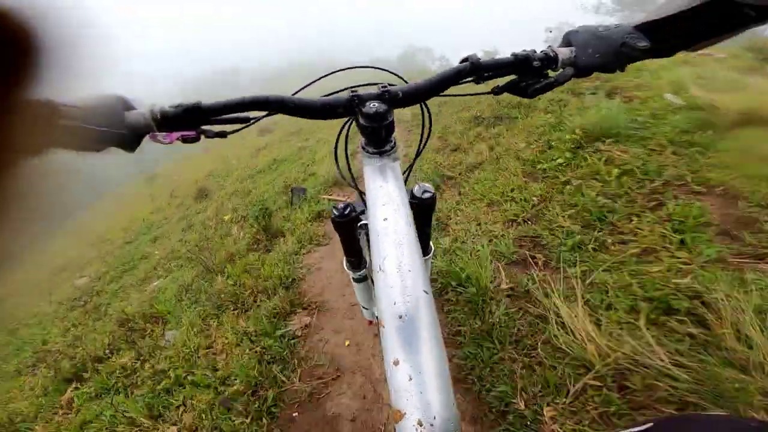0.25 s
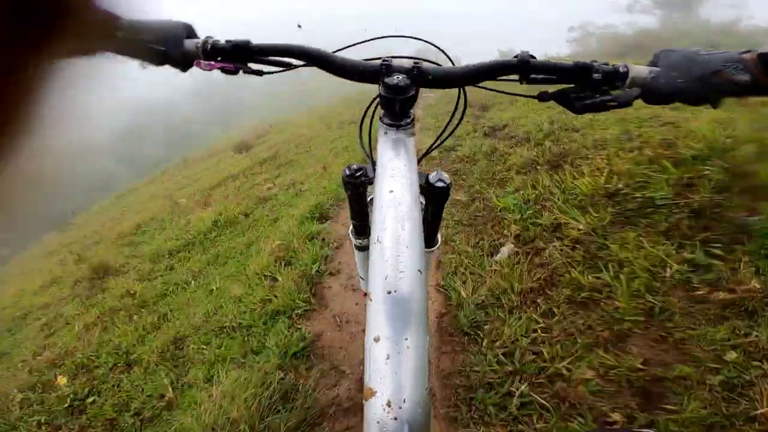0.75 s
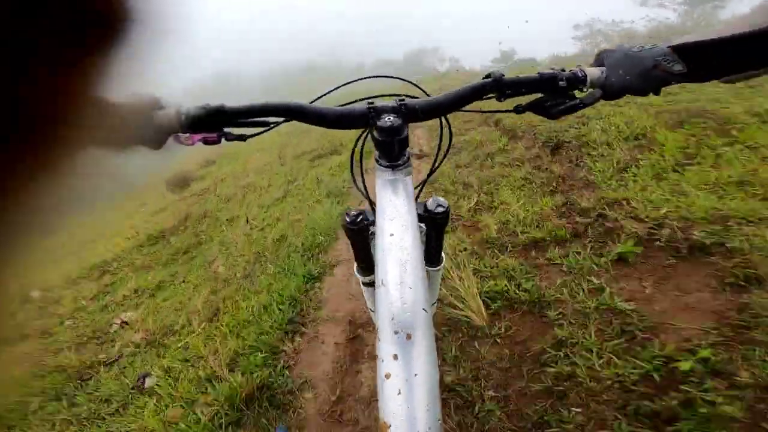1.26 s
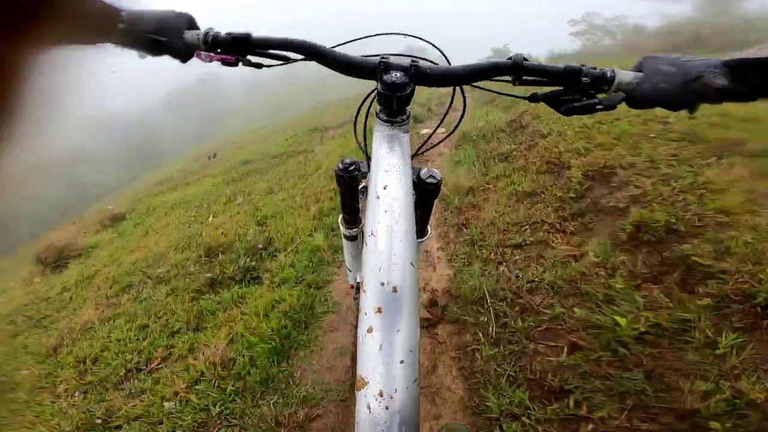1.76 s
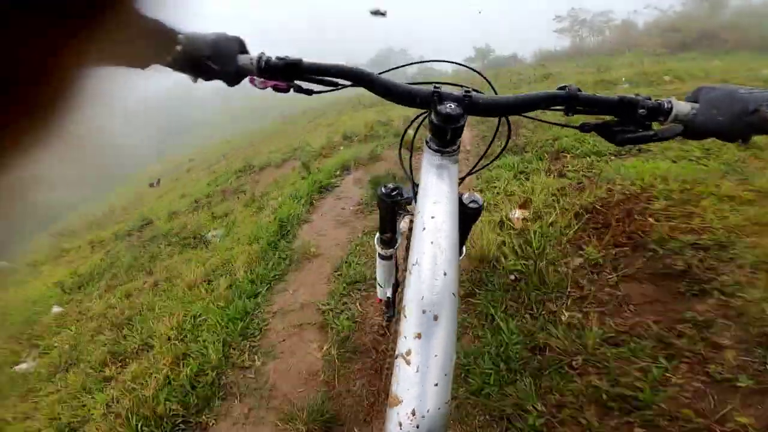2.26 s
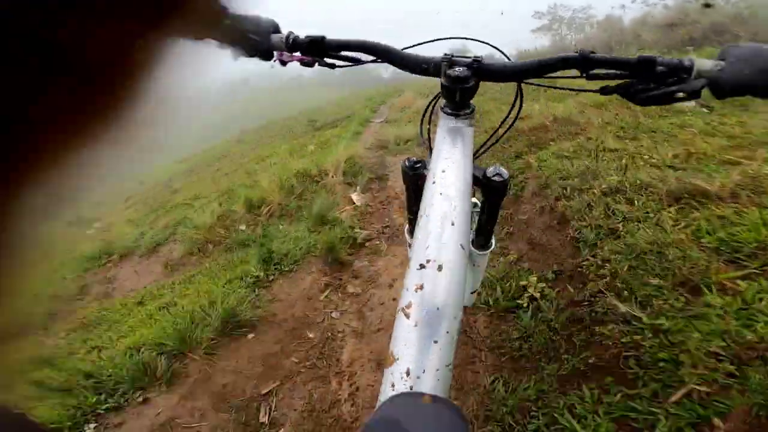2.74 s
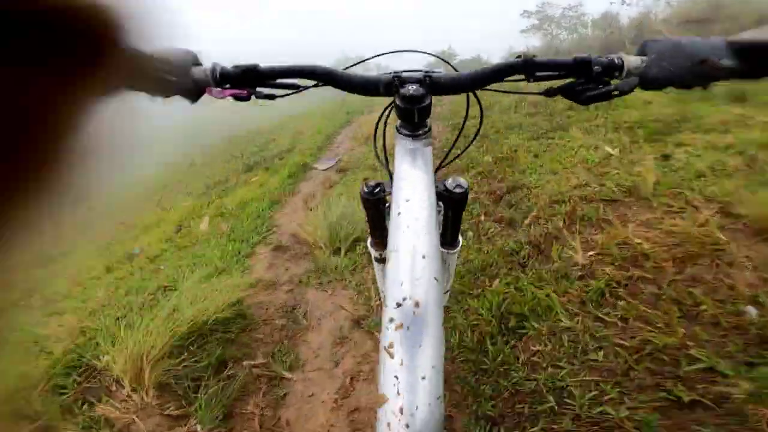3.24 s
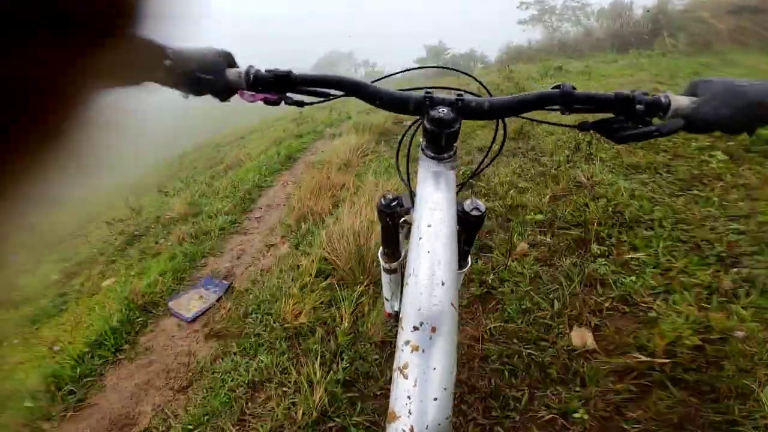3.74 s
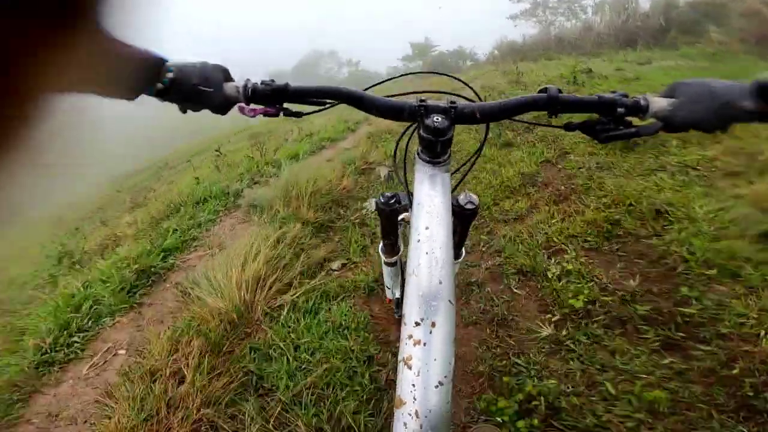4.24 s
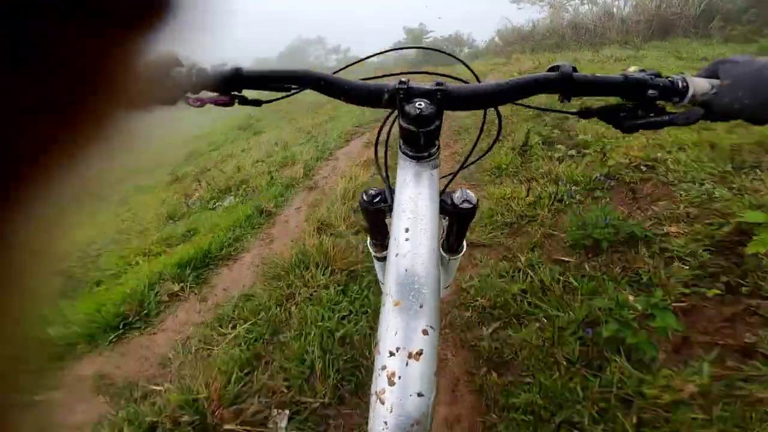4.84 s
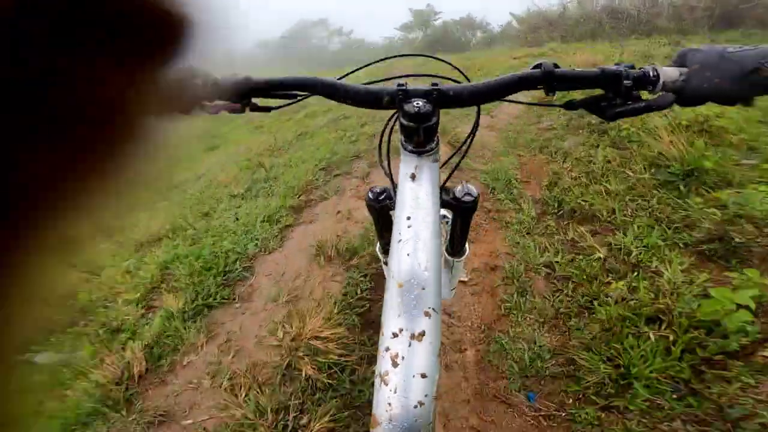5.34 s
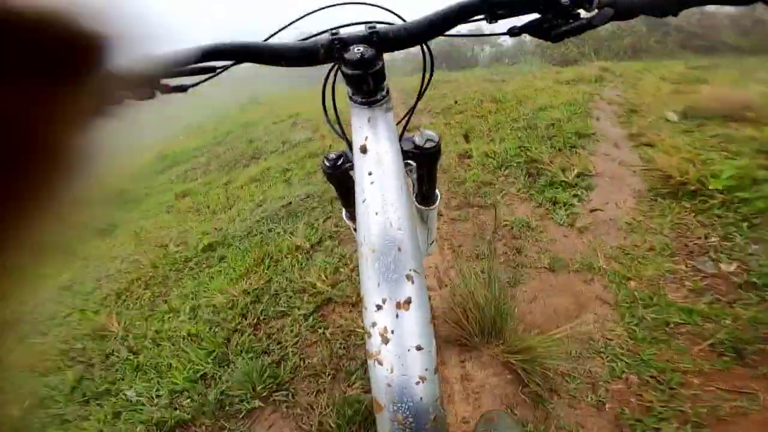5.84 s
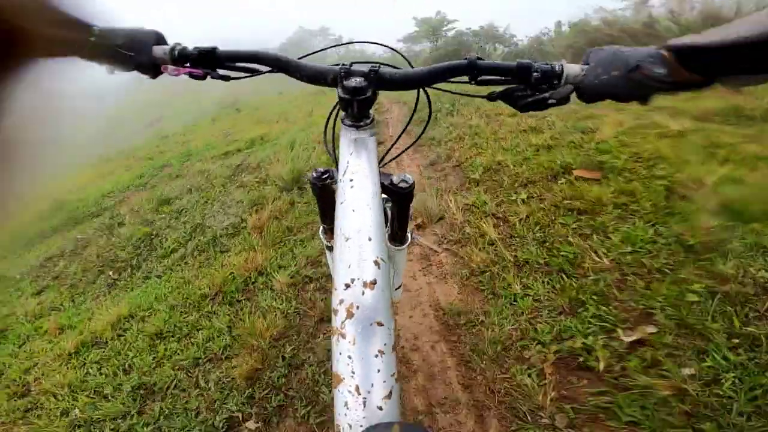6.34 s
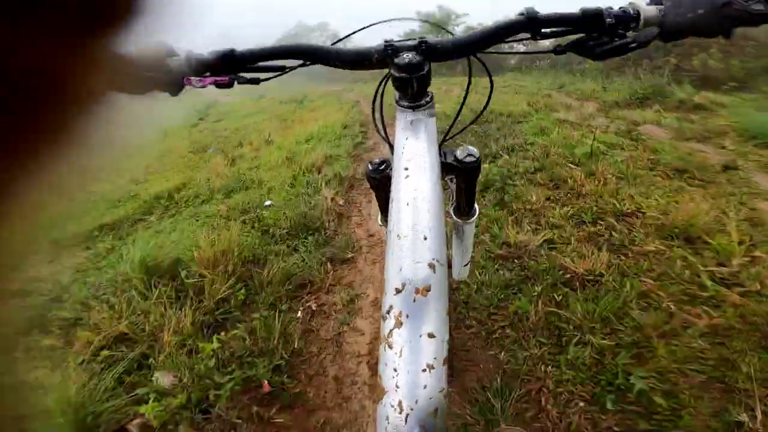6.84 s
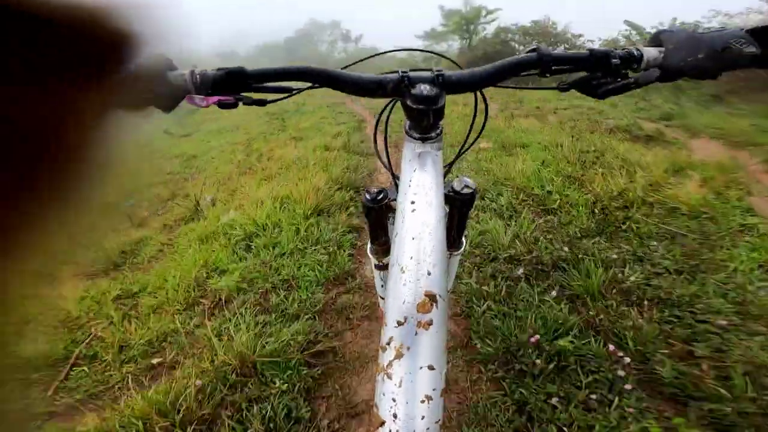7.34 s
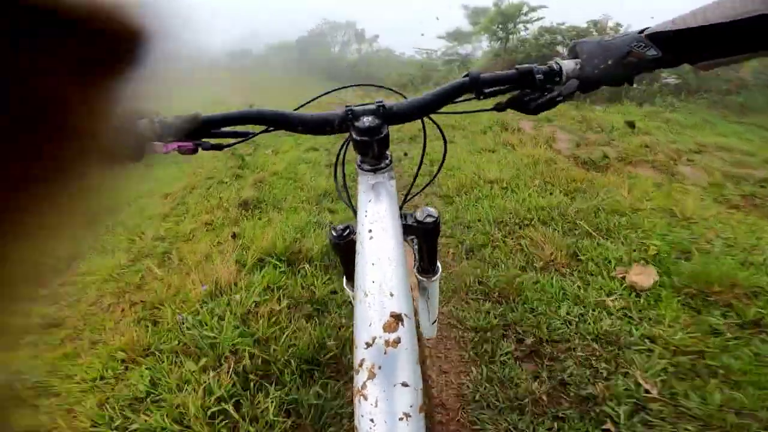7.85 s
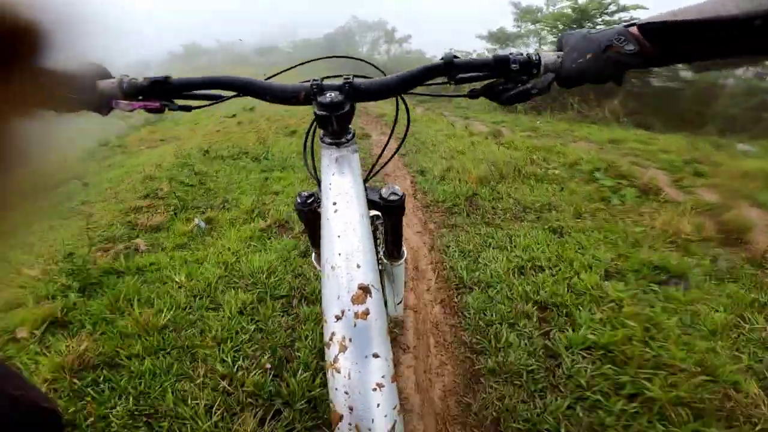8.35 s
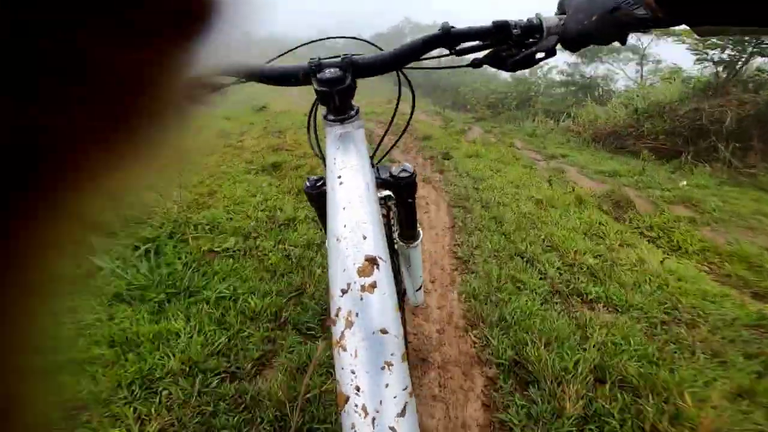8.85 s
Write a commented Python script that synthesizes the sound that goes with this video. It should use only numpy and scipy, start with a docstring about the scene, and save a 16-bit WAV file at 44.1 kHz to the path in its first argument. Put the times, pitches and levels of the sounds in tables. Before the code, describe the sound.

A mountain bike rolls down a wet, muddy trail, heard from a chest-worn microphone. Wind thumps and flutters, strongest at the start and around 7 seconds, while tyres roar softly on soil and hiss through grass. From about 0.2 seconds wet disc brakes squeal loudly on a nearly steady pitch, wavering, with rasping bites and tiny shrieks. The squeal drops out around 3 seconds, where grit ticks and the fork knocks, then returns at 3.2 seconds and holds until about 5.7. A very faint high sizzle passes between 5 and 6 seconds. The squeal comes in short spurts around 6 and 6.4 seconds, sounds fully again from 7 to 8, then fades away. Rougher tyre noise, a sharp tick and a cluster of knocks follow from 8.2 seconds, with a metallic clink near 8.9. The brakes catch sharply once more at about 9 seconds.

```python
"""Two wet disc brakes squeal, dragged as a mountain bike rolls down a muddy trail.
Pads stick and slip on two rotors of nearly the same pitch, which beat. Tyres roar on soil and hiss
through mud and grass, grit ticks on the frame, bumps knock the fork and a faint sizzle comes and goes.
Wind buffets a chest-worn microphone; a limiter holds the peaks."""
import sys
import numpy as np
from scipy import signal
from scipy.fft import rfft, irfft, next_fast_len
from scipy.io import wavfile
from scipy.ndimage import uniform_filter1d, minimum_filter1d

SR = 44100
rng = np.random.default_rng(int(sys.argv[2]) if len(sys.argv) > 2 else 0)


def output_pcm(signal):
    """Save a mono or channel-first signal as 16-bit PCM at the path in sys.argv[1].

    Samples are clipped to [-1, 1] before scaling.
    """
    pcm = np.clip(np.atleast_2d(signal).T, -1, 1) * 32767
    wavfile.write(sys.argv[1], SR, np.round(pcm).astype(np.int16))


N = 400718


def undb(db):
    """Decibels to gain."""
    return 10 ** (np.asarray(db) / 20)


def unit(x):
    """Scale to rms 1."""
    return x / np.sqrt(np.mean(x ** 2))


def curves(table):
    """Columns after t/s, interpolated to every sample."""
    times_s, *columns = np.transpose(table)
    return [np.interp(np.arange(N) / SR, times_s, column) for column in columns]


def walk(rate_hz):
    """Smooth random drift, rms 1."""
    step = max(int(SR / rate_hz), 2)
    points = rng.standard_normal(N // step + 2)
    joined = np.interp(np.arange(N) / step, np.arange(len(points)), points)
    return unit(uniform_filter1d(joined, step))


def flickering_bands(noise, spectrum, shared_db, flicker_db, flicker_hz):
    """Colour noise, rms 1; each half-octave band follows a shared level and its own flicker."""
    hz, db = np.transpose(spectrum)
    n = next_fast_len(N)
    bin_hz = np.maximum(np.arange(n // 2 + 1) * SR / n, 1)
    coloured = rfft(noise, n) * undb(np.interp(np.log(bin_hz), np.log(hz), db, left=-80, right=-80))
    out = 0
    for octave in np.arange(np.log2(hz[0]), np.log2(hz[-1]) + .5, .5):
        band = np.clip(1 - 2 * abs(np.log2(bin_hz) - octave), 0, 1)
        out += irfft(coloured * band, n)[:N] * undb(shared_db + flicker_db * walk(flicker_hz))
    return unit(out)


def add_burst(out, start_s, db, hz, edge_ratio, rise_s, t60_s):
    """Add band noise that rises and dies away."""
    t = np.arange(int(.25 * SR)) / SR
    edges_hz = np.clip([hz / edge_ratio, hz * edge_ratio], 40, 15000)
    bandpass = signal.butter(3, edges_hz, "band", fs=SR, output="sos")
    noise = unit(signal.sosfilt(bandpass, rng.standard_normal(len(t))))
    envelope = np.exp(-np.log(1000) * t / t60_s) * np.minimum(t / rise_s, 1)
    i = int(start_s * SR)
    out[i:i + len(t)] += (undb(db) * noise * envelope)[:N - i]


# sizzle before its high-pass: t/s, level/dB
SIZZLE_LEVELS = [(4.3, -71), (4.8, -52), (5.9, -50), (6.4, -70)]

def sizzle():
    """Faint noise above 12 kHz swells and fades."""
    highpass = signal.butter(4, 12000, "high", fs=SR, output="sos")
    return signal.sosfilt(highpass, rng.standard_normal(N)) * undb(curves(SIZZLE_LEVELS)[0])


# tyre spectra: f/Hz, relative density/dB
ROAR_SPECTRUM = [(400, 0.5), (600, 3), (850, 7), (1100, -1.5), (1700, -4.5), (2400, -8), (3500, -41.5)]
HISS_SPECTRUM = [(1200, 7), (2400, 11), (4500, 8.5), (6500, 0), (7800, -1.5), (9500, -13), (12000, -20.5),
                 (15000, -36.5)]
# louder on rough ground: t/s, roar/dB, hiss/dB
TYRE_LEVELS = [(0, -21, -23.5), (.1, -27, -29), (.5, -30, -27), (1.47, -25.5, -23.5), (1.6, -30.5, -32.5),
               (2.35, -26.5, -27.5), (3.0, -31.5, -31), (3.25, -18, -24.5), (3.62, -30.5, -30),
               (4.55, -34, -30.5), (5.4, -30, -28), (6.15, -21.5, -24.5), (6.45, -26.5, -29),
               (6.63, -21, -19.5), (6.72, -30, -26), (6.86, -14.5, -22), (7.08, -46, -34.5),
               (7.19, -27, -27), (7.64, -33, -32.5), (8.2, -18.5, -24), (8.35, -30, -28),
               (8.55, -17.5, -25), (9.09, -16, -24)]

def tyres():
    """Knobs roar on wet soil; mud and grass spray in short swishes of fine grains."""
    roar_db, hiss_db = curves(TYRE_LEVELS)
    jolts = walk(22)
    grains = undb(3.25 * np.minimum(rng.exponential(1, N), 6))
    soil = rng.standard_normal(N) * grains
    roar = flickering_bands(soil, ROAR_SPECTRUM, 1.8 * jolts, flicker_db=3.23, flicker_hz=20)
    spray = rng.standard_normal(N) * grains
    swish_db = 0.68 * jolts + 1.86 * walk(90)
    hiss = flickering_bands(spray, HISS_SPECTRUM, swish_db, flicker_db=2.65, flicker_hz=30)
    return roar * undb(roar_db) + hiss * undb(hiss_db)


# wind spectra: f/Hz, relative density/dB
THUMP_SPECTRUM = [(20, -5), (50, 2), (90, -0.5), (140, -4), (250, -15)]
FLUTTER_SPECTRUM = [(150, -4), (260, 1.5), (450, -5), (650, -20.5)]
# gusts: t/s, thump/dB, flutter/dB
GUST_LEVELS = [(0, -4.5, -4), (.33, -11.5, -27), (.46, -4.5, -17), (.53, -21.5, -42), (.64, -7.5, -17.5),
               (1.2, -12.5, -32.5), (1.55, -9.5, -29.5), (1.62, -17, -34), (2.85, -23, -30.5),
               (3.35, -15.5, -25.5), (4.25, -32.5, -34.5), (4.5, -23, -31.5), (4.69, -13.5, -31),
               (4.8, -33, -35), (5.42, -28.5, -32.5), (5.52, -18, -29.5), (5.95, -15, -23.5),
               (7.22, -5.5, -23), (7.7, -13.5, -39), (8.2, -12.5, -22), (8.45, -14, -37), (8.6, -21, -22),
               (9.09, -25, -20)]

def wind():
    """Big eddies thump on the microphone port, small ones flutter, in the same buffets."""
    thump_db, flutter_db = curves(GUST_LEVELS)
    buffets = 0.48 * walk(12) + walk(35)
    thump = flickering_bands(rng.standard_normal(N), THUMP_SPECTRUM, 2.31 * buffets, 1.5, 6)
    flutter = flickering_bands(rng.standard_normal(N), FLUTTER_SPECTRUM, 3.55 * buffets, 0.71, 21)
    return thump * undb(thump_db) + flutter * undb(flutter_db)


# grit on the frame: t/s, tick/dB, splash re tick/dB
GRIT_TICKS = [(0.471, -20, 0.5), (2.912, -23, 0), (3.037, -21.5, 1.5), (3.184, -17.5, 1), (4.433, -17, -26),
              (5.148, -17, -7), (5.722, -14, -4.5), (6.557, -18, 1), (6.6257, -16.5, -6), (6.749, -19, 1),
              (6.83, -19, -3), (8.023, -19.5, -10), (8.19, -29, -11), (8.2438, -3, -32), (9.012, -13.5, -3)]
# bumps: t/s, level/dB, f/Hz
FORK_KNOCKS = [(3.179, -6, 493), (3.367, -10, 840), (3.459, -7, 965), (6.299, -6.5, 700),
               (8.407, -4.5, 730), (8.421, 0, 825), (8.436, -6, 744), (8.67, -5, 600), (9.014, -3.5, 530)]

def impacts():
    """Grit ticks with a mud splash; bumps knock fork and frame with a broad thud; one clink rings."""
    out = np.zeros(N)
    for at_s, db, splash_db in GRIT_TICKS:
        add_burst(out, at_s, db, hz=3660, edge_ratio=1.9, rise_s=.001, t60_s=.016)
        add_burst(out, at_s, db + splash_db, hz=3000, edge_ratio=2.1, rise_s=.008, t60_s=.15)
    for at_s, db, hz in FORK_KNOCKS:
        add_burst(out, at_s, db, hz, edge_ratio=1.6, rise_s=.005, t60_s=.06)
        add_burst(out, at_s, db - 4, hz=450, edge_ratio=2.5, rise_s=.006, t60_s=.06)  # thud
    add_burst(out, start_s=8.896, db=-1, hz=1680, edge_ratio=1.07, rise_s=.0007, t60_s=.05)  # clink
    return out


def pad_touch():
    """Pads meet the rotor again: a brief note above the squeal's pitch."""
    start_s, length_s, rise_s, fall_s, hz = 3.092, .06, .004, .025, 810
    t = np.arange(N) / SR - start_s
    envelope = np.clip(np.minimum(t / rise_s, (length_s - t) / fall_s), 0, 1)
    return undb(-14.5 + 3 * walk(90)) * envelope * np.sin(2 * np.pi * hz * t + 0.43 * walk(120))


# pads grab: start/s, end/s, level/dB of partials 3, 4, 5, 7
PAD_BITES = [(0.183, 0.367, -29, -52, -51, -65), (0.604, 0.696, -16.5, -37, -37, -48),
             (1.1, 1.153, -13.5, -31, -37, -45), (1.503, 1.598, -16, -34, -38, -42),
             (1.947, 1.996, -16.5, -21, -29, -46), (2.304, 2.39, -25.5, -35, -31.5, -40),
             (2.464, 2.53, -25, -31, -40, -45), (2.574, 2.612, -16, -27, -38, -48),
             (3.436, 3.548, -22, -31.5, -32.5, -38), (3.62, 3.73, -28, -35, -37, -45),
             (3.76, 4.057, -36, -36, -43, -52), (4.63, 4.816, -25, -24.5, -43, -49),
             (5.022, 5.095, -19, -25, -40, -32), (5.133, 5.333, -21, -37, -38, -44),
             (6.319, 6.383, -16, -37, -45, -43), (7.258, 7.388, -24, -29, -32, -27.5),
             (7.649, 7.738, -20, -28, -37, -48), (7.752, 7.922, -22.5, -22, -31, -32),
             (9.041, 9.093, -16, -26, -24, -36)]

def bite_gains():
    """Upper partials leap up in 22 ms at each grab: the tone rasps."""
    gains = np.zeros((4, N))
    for start_s, end_s, *db in PAD_BITES:
        gains[:, int(start_s * SR):int(end_s * SR)] = undb(db)[:, None]
    return uniform_filter1d(gains, int(0.022 * SR))


# rear rotor pitch peaks: t/s
REAR_PEAKS_S = [0, 0.468, 0.968, 1.36, 1.782, 2.222, 2.751, 3.302, 3.798, 4.05, 4.398, 4.978, 5.35, 5.721,
                6.25, 6.698, 7.142, 7.621, 8.25, 9.091]

def rotor_phases(grip_db):
    """Looser pads slip faster; the farther, rear rotor rises and sags about once a wheel turn."""
    slip_hz, loose_hz_per_db = 732, 0.28
    offset_hz, swing_hz, jitter_hz = 4, 20.19, 7
    front_hz = (slip_hz - loose_hz_per_db * grip_db) * (1 + 0.00349 * walk(50))
    turns = np.interp(np.arange(N) / SR, REAR_PEAKS_S, np.arange(len(REAR_PEAKS_S)))
    rear_hz = front_hz + offset_hz + swing_hz * np.cos(2 * np.pi * turns) + jitter_hz * walk(25)
    return 2 * np.pi * np.cumsum([front_hz, rear_hz], axis=1) / SR


def partial(k, phases, rear_gain, chatter, chatter_hz):
    """Harmonic k of the rotors, rms 1; pad chatter scatters its amplitude and phase."""
    front, rear = phases
    scatter = 1 + chatter * (walk(chatter_hz) + 1j * walk(chatter_hz))
    wave = scatter * (np.exp(1j * k * front) + rear_gain * np.exp(1j * k * rear))
    steadied = wave / (0.5 + abs(wave)) ** 0.51  # self-excited vibration holds its swing
    return unit(steadied.imag)


# squeal: t/s, grip re full/dB, partial 1/dB
PAD_GRIP = [(0, -11, -19), (.1, -18.5, -19), (.25, -6.5, -17), (1.46, -3, -18), (2.5, 0, -11.5),
            (2.8, -17, -23), (3.05, -36, -42), (3.22, -2, -15.5), (3.9, 0, -16.5), (4.6, -7.5, -14),
            (5.2, 0.5, -14.5), (5.5, -4, -12), (5.77, -14.5, -17.5), (6.03, -1, -15.5), (6.09, -20, -25),
            (6.28, -22, -24.5), (6.335, 0.5, -19), (6.53, -7, -18), (6.7, -27, -30), (6.96, -1, -12.5),
            (7.4, 0, -21), (7.9, -2.5, -15.5), (8.1, -14, -23), (8.39, -24, -21.5), (8.44, -42.5, -31),
            (9.02, -44.5, -41), (9.05, 0, -18)]
# stuttering partials: harmonic, level re fifth_gain/dB
HIGH_PARTIALS = [(5, 3), (6, -3), (8, -12), (9, -17), (10, -16.5)]
# one partial shrieks briefly: t/s, harmonic, level/dB
SHRIEKS = [(2.457, 7, -21), (3.645, 7, -16), (3.873, 5, -15.5), (5.07, 7, -20.5)]
# pads let go, then catch sharply: t/s
PAD_LAPSES_S = [2.6, 4.505]

def brake_squeal():
    """Pads stick and slip in uneven spurts on two beating rotors; the nearer one leads the rasp."""
    shriek_s, lapse_s, catch_s, lapse_db = .0049, .038, .0032, -16.5
    t = np.arange(N) / SR
    grip_db, first_db = curves(PAD_GRIP)
    bite3, bite4, bite5, bite7 = bite_gains()
    phases = rotor_phases(grip_db)
    second_db = grip_db - 9 + 3 * np.tanh(walk(16))
    first_gain = undb(first_db + 3.45 * np.tanh(walk(14)))
    out = first_gain * partial(1, phases, rear_gain=0.8, chatter=0.56, chatter_hz=45)
    out += undb(second_db) * partial(2, phases, rear_gain=0.83, chatter=1.9, chatter_hz=90)
    # between bites a weak rasp follows partial 2
    third_gain = bite3 + undb(second_db - 15.5)
    out += third_gain * partial(3, phases, rear_gain=0.73, chatter=1.04, chatter_hz=70)
    fourth_gain = (bite4 + undb(second_db - 27.5)) * undb(4.4 * np.tanh(walk(40)))
    out += fourth_gain * partial(4, phases, rear_gain=0.4, chatter=1.4, chatter_hz=75)
    rasp = np.tanh(walk(45))
    seventh_gain = (bite7 + undb(second_db - 47)) * undb(6.8 * rasp)
    out += seventh_gain * partial(7, phases, rear_gain=0, chatter=1.0, chatter_hz=75)
    fifth_gain = bite5 + undb(second_db - 38)
    for k, db in HIGH_PARTIALS:
        stutter = undb(db + 5 * np.tanh(walk(50)) + 3 * rasp)
        out += fifth_gain * stutter * partial(k, phases, rear_gain=0.59, chatter=1.4, chatter_hz=80)
    for at_s, k, db in SHRIEKS:
        out += undb(db) * np.exp(-((t - at_s) / shriek_s) ** 2) * np.sin(k * phases[0])
    for at_s in PAD_LAPSES_S:
        out *= undb(np.interp(t - at_s, [-lapse_s, 0, catch_s], [0, lapse_db, 0]))
    return out


def scene():
    """All sources at one microphone."""
    return (brake_squeal() + wind() + tyres() + impacts() + pad_touch() + sizzle())[None]


def record(dry):
    """Fast peak limiter, then low-pass."""
    threshold, span, cutoff_hz = 1.04, SR // 2500, 15400
    needed_gain = 1 / np.maximum(abs(dry), threshold)
    gain = uniform_filter1d(minimum_filter1d(needed_gain, span), span)
    lowpass = signal.ellip(8, .2, 70, cutoff_hz, fs=SR, output="sos")
    return signal.sosfilt(lowpass, np.clip(dry * gain, -1, 1))


dry = scene()
out = record(dry)
output_pcm(out)
```